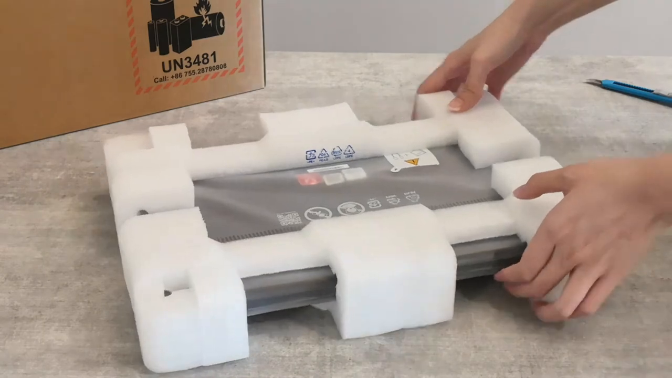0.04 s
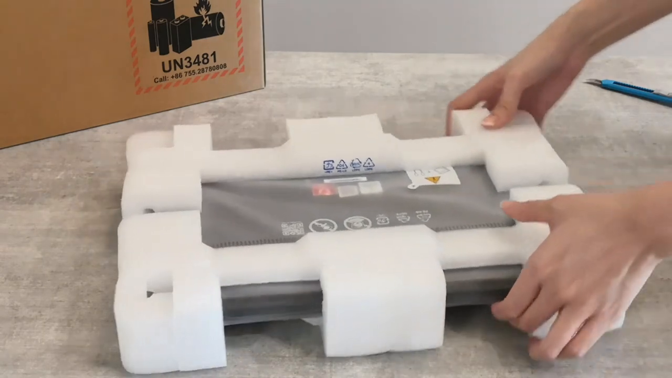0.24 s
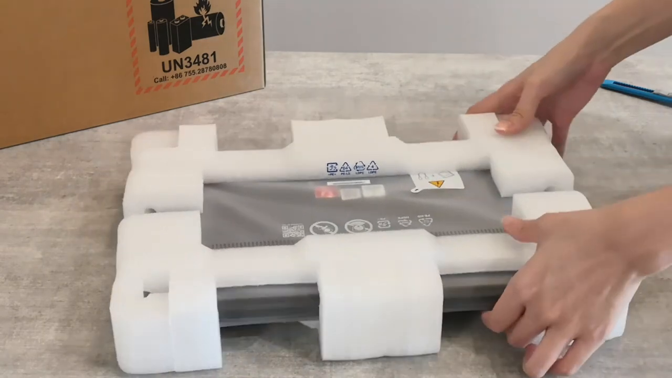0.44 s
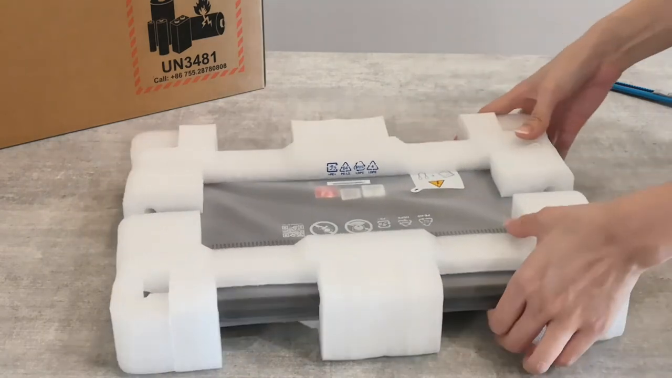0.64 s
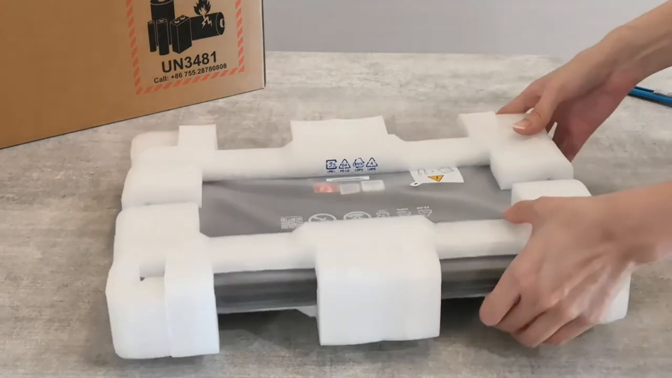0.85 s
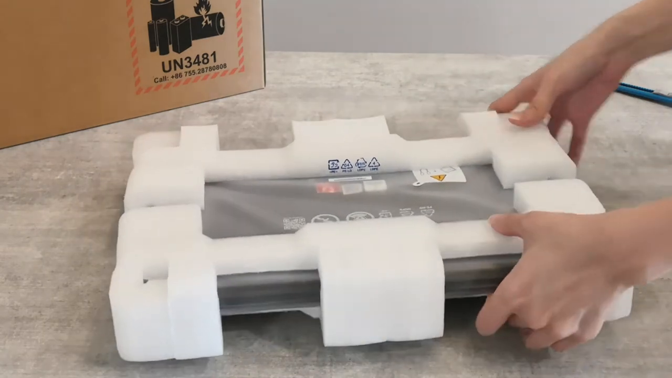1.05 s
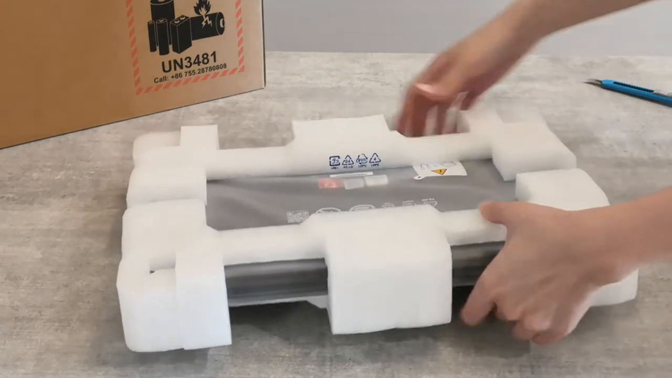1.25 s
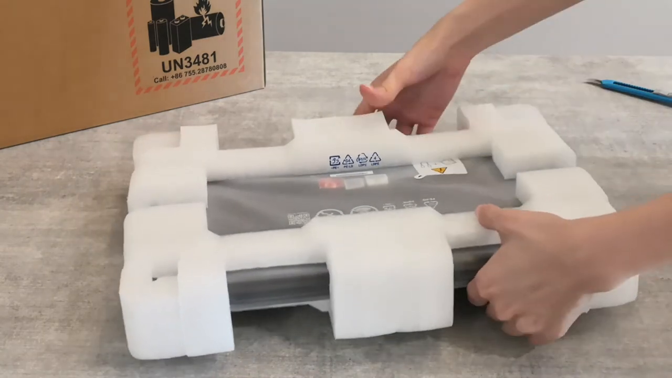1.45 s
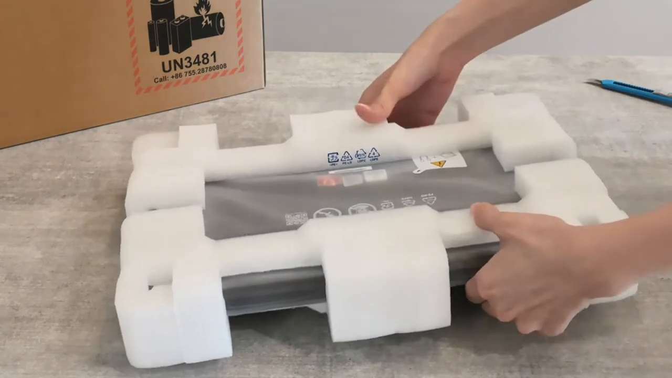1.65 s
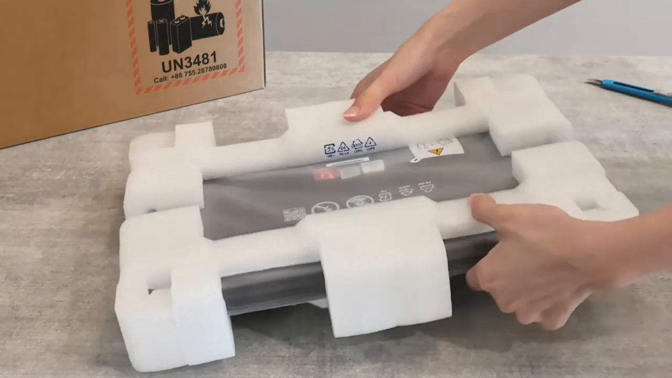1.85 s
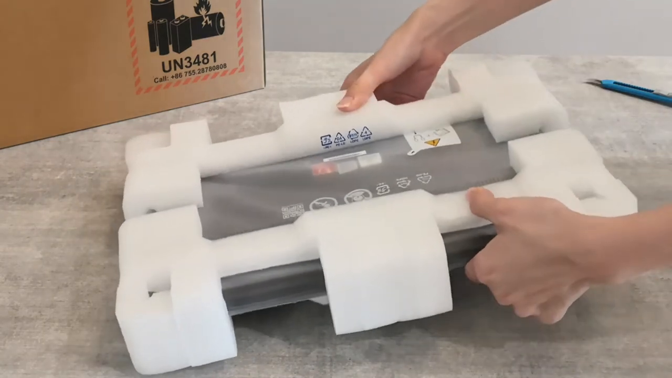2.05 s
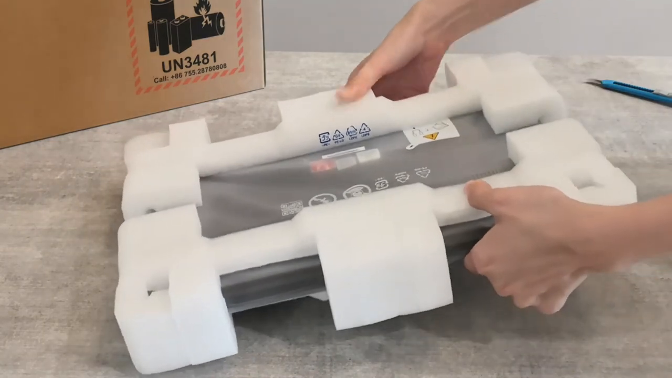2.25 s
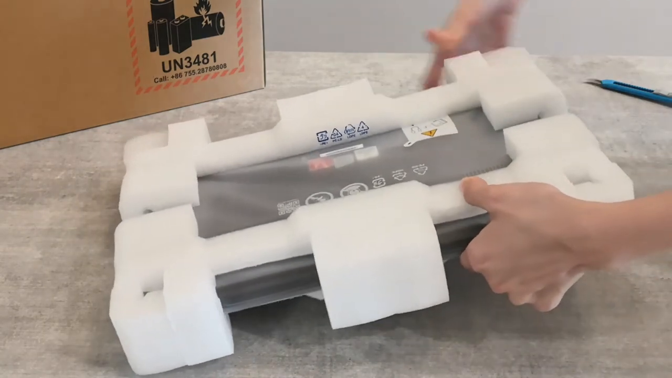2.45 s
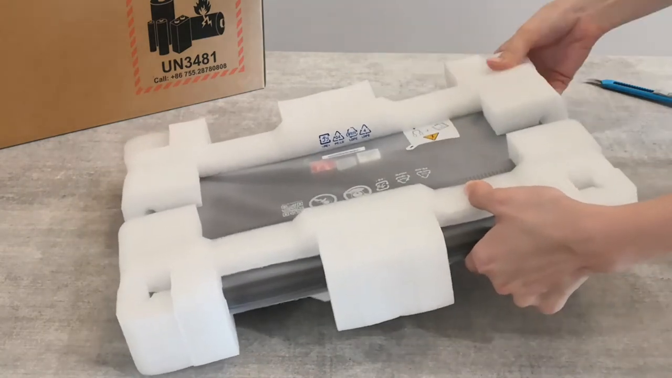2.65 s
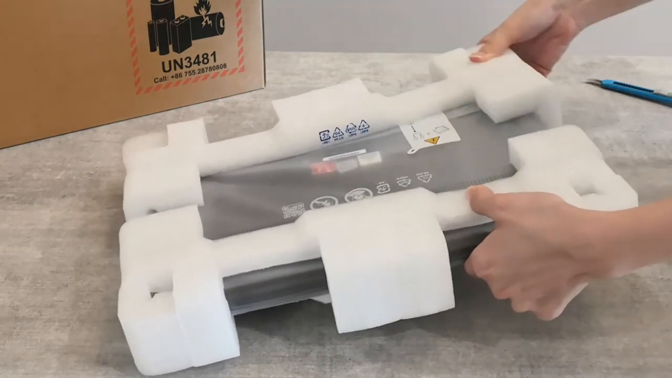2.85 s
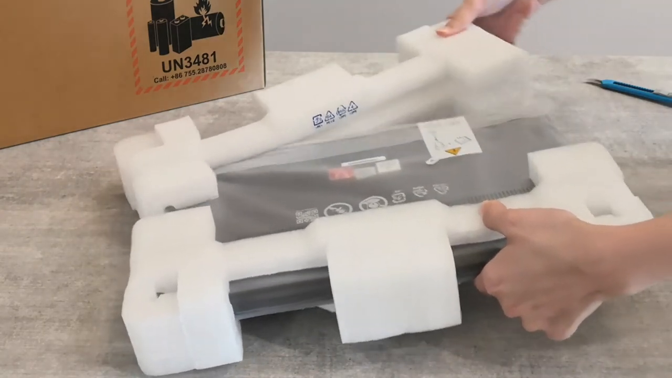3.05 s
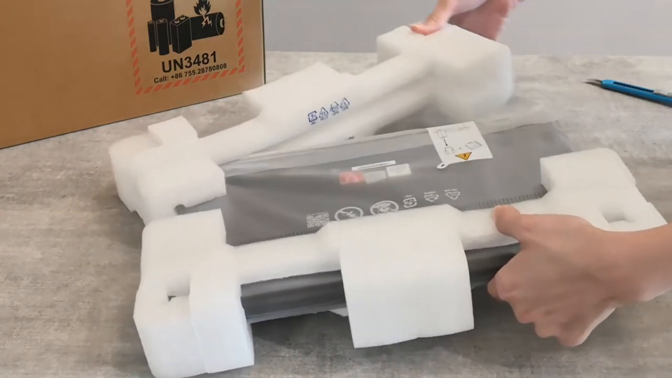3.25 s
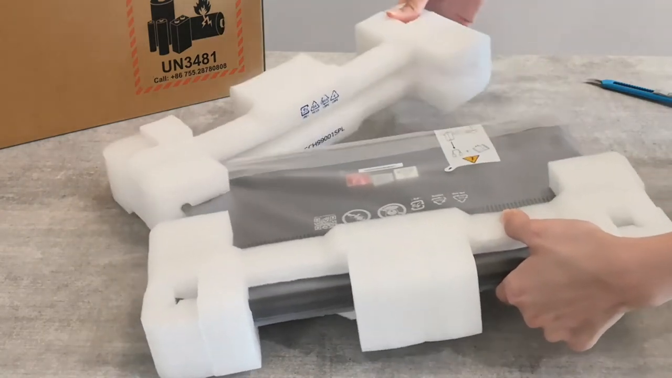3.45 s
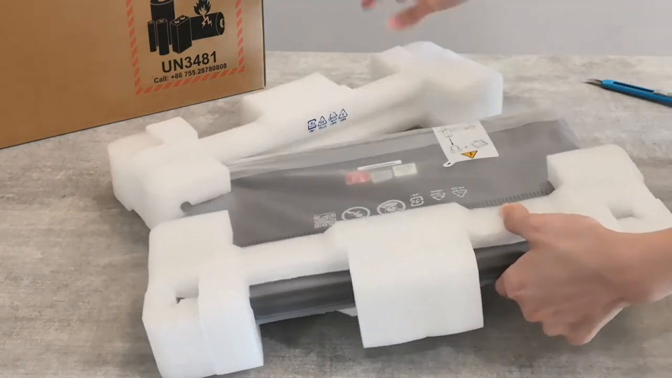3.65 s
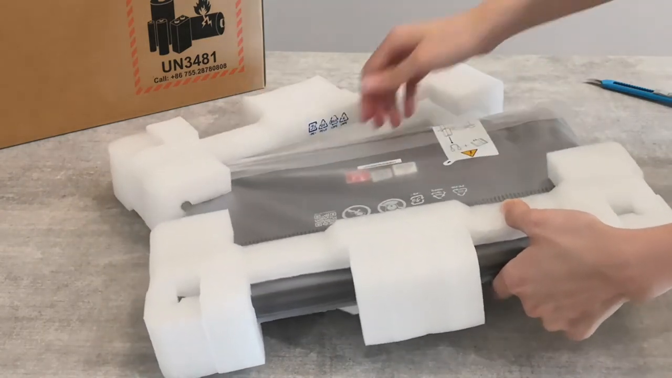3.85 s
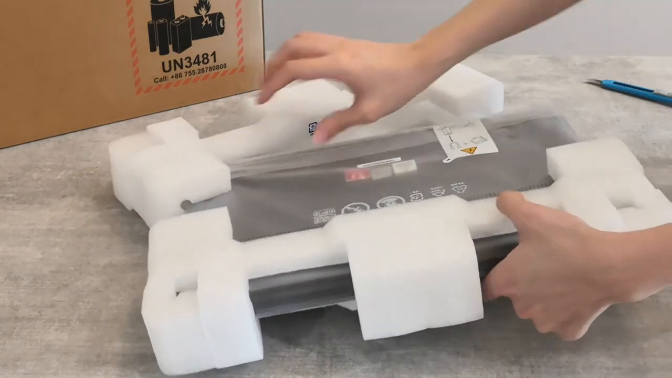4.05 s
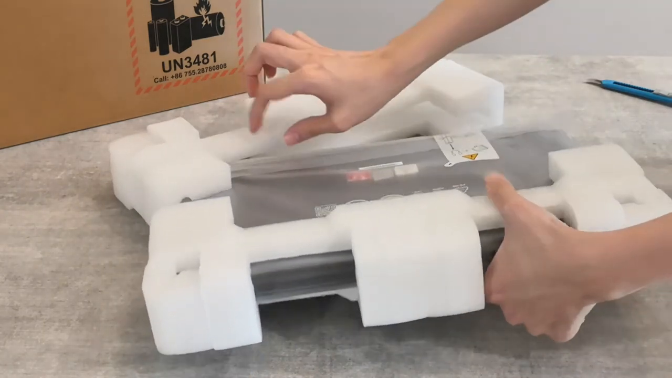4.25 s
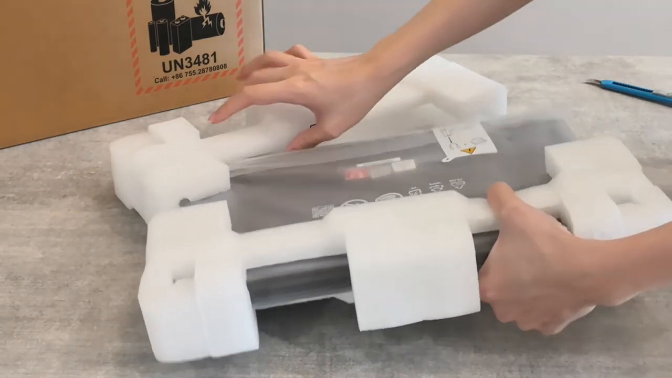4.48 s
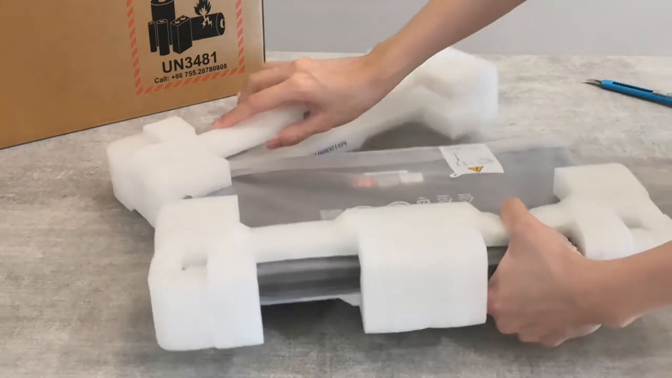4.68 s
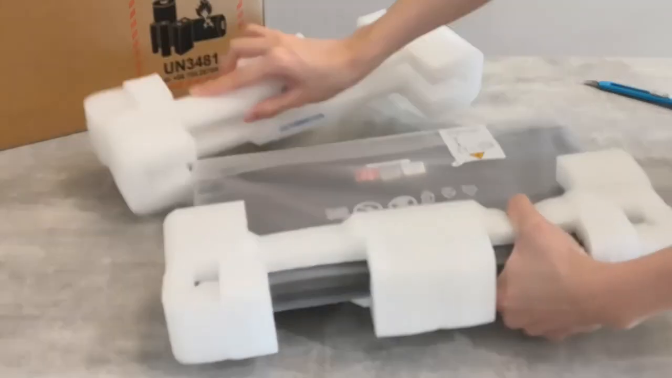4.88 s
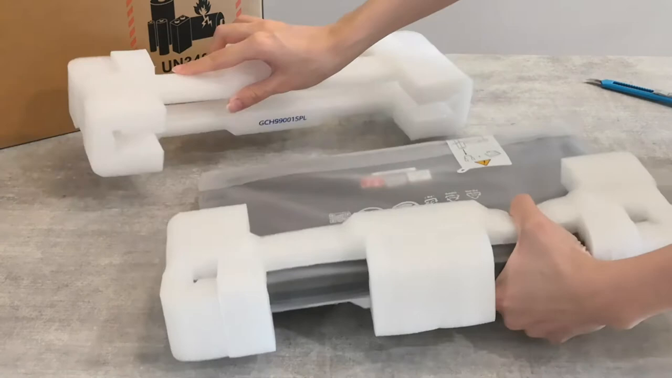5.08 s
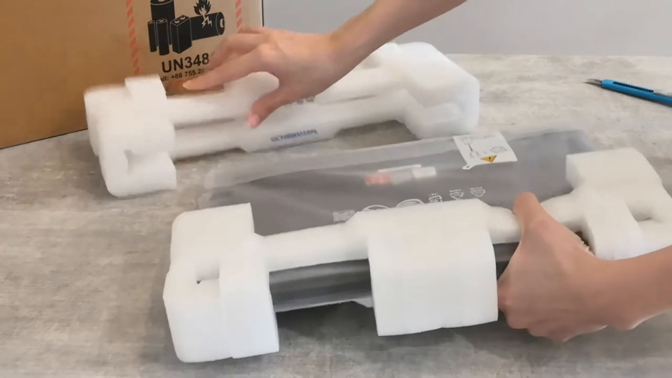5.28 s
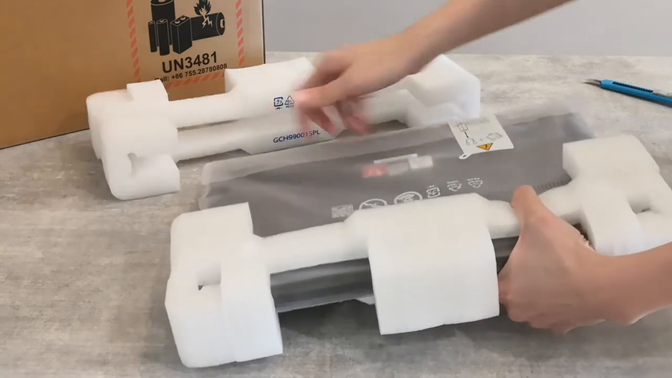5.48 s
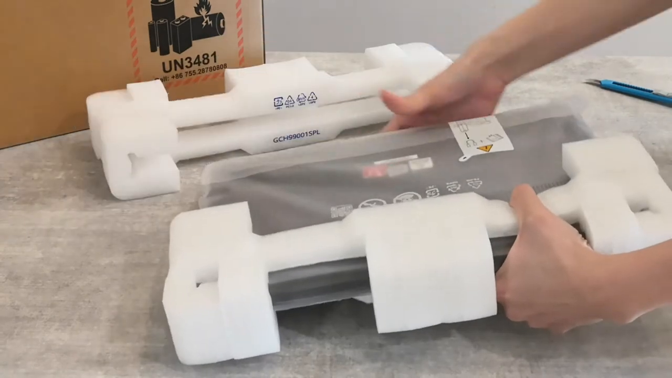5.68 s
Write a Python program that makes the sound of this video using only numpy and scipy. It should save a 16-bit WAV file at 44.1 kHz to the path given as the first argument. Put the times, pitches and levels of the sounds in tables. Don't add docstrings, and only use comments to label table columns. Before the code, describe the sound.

Foam packing scrapes briefly over a stone table, then squeaky rubbing, sharp snaps as a piece pulls free, plastic rustle and a soft thud.

```python
import sys
import numpy as np
from scipy import signal
from scipy.fft import rfft, irfft, next_fast_len
from scipy.io import wavfile
from scipy.ndimage import uniform_filter1d, map_coordinates

SR = 44100
rng = np.random.default_rng(int(sys.argv[2]) if len(sys.argv) > 2 else 0)


def transcribe(signal):
    frames = np.atleast_2d(signal).T
    limited = np.clip(frames, -1, 1)
    pcm = np.round(limited * 32767).astype(np.int16)
    wavfile.write(sys.argv[1], SR, pcm)


def attenuation_scalar(level_db):
    decades = np.asarray(level_db, float) / 20
    return 10 ** decades


N = 252252


def unit(x):
    return x / np.sqrt(np.mean(x ** 2) + 1e-20)


def along(points, hz):
    point_hz, value = np.transpose(points)
    return np.interp(np.log(hz + 1), np.log(point_hz + 1), value)


def line(rows, col):
    s, value = np.transpose(rows)[[0, col]]
    return np.interp(np.arange(N) / SR, s, value)


def wobble(rate_hz):
    knots = rng.standard_normal(int(N * rate_hz / SR) + 4)
    return map_coordinates(knots, [np.arange(N) * rate_hz / SR])


def filtered(x, response):
    size = next_fast_len(x.shape[-1] + 8192)
    spectrum = rfft(x, size) * response(np.fft.rfftfreq(size, 1 / SR))
    return irfft(spectrum, size)[..., :x.shape[-1]]


def resonance(f, hz, width_hz):
    return 1j * f * width_hz / (hz * hz - f * f + 1j * f * width_hz)


def spread(pair, spectrum, alike):
    def response(hz):
        turn = np.arccos(np.clip(along(alike, hz), -1, 1)) / 2
        return attenuation_scalar(along(spectrum, hz)) * [np.cos(turn), np.sin(turn)]
    mid, side = filtered(pair, response)
    return unit(np.array([mid + side, mid - side]))


def streaked(pair, depth_db):
    z = signal.stft(pair, nperseg=1024)[2]
    field = uniform_filter1d(rng.standard_normal(z.shape[1:]), 3, 0)
    field = uniform_filter1d(field, 7, 1)
    return signal.istft(z * attenuation_scalar(depth_db * unit(field)), nperseg=1024)[1][:, :N]


def room(x, length_s=0.55):
    # hz, t60_s
    decay = [(200, 0.23), (1000, 0.48), (3000, 0.46), (10000, 0.31)]
    hz, t, z = signal.stft(rng.standard_normal((2, int(length_s * SR))), SR, nperseg=256)
    build = 1 - np.exp(-(t / 0.0072) ** 2)
    age_s = np.maximum(0.58 * t, 1.8 * (t - 0.05))
    fall = attenuation_scalar(-60 * age_s / along(decay, hz)[:, None])
    tail = signal.istft(z * build * fall, SR, nperseg=256)[1]
    return signal.fftconvolve(x, tail / np.linalg.norm(tail[0]), axes=1)


def air():
    # hz, db_per_hz
    vent = [(12, -29), (20, -3.5), (44, -6), (153, 0.5), (523, -18.5), (940, -15.5), (1310, -18.5),
            (2110, -13.5), (2710, -14.5), (4120, -22.5), (7200, -26), (10900, -37.5), (14500, -38),
            (15700, -45)]
    # hz, likeness
    far = [(60, 0.91), (130, 1), (290, 0.64), (640, -0.32), (1410, 0.079), (3100, -0.15), (6820, -0.0095),
           (15000, 0.029)]
    level_db, drift_db = -63.5 + 2.5, 0.4 * wobble(2.5) + 0.5 * wobble(12)
    noise = streaked(rng.standard_normal((2, N)), depth_db=1.0)
    return attenuation_scalar(level_db + drift_db) * spread(noise, vent, far)


def slips(share):
    slips_per_s = 3000
    chance = rng.random((2, N))
    sizes = attenuation_scalar(np.minimum(4.0 * rng.exponential(size=N), 11)) * (chance[0] < slips_per_s / SR)
    grains = unit(sizes * np.sign(chance[1] - 0.5))
    bed = streaked(rng.standard_normal((2, N)), depth_db=2.0)
    clumps = attenuation_scalar(0.65 * wobble(100) + 0.69 * wobble(300))
    return clumps * (bed + share * np.array([grains, np.roll(grains, 37)]))


def efforts():
    # time_s, rubbing_db
    slide = [
        (0.03, -80),
        (0.048, -56.5),
        (0.12, -36.5),
        (0.22, -33),
        (0.278, -33.5),
        (0.422, -35),
        (0.476, -44.5),
        (0.522, -64.5),
        (0.62, -71),
    ]
    # time_s, rubbing_db, sleeve_hiss_db
    pull = [
        (2.86, -77.5, 8),
        (2.91, -56, 10),
        (2.952, -40.5, -2),
        (3.024, -41.5, 0.5),
        (3.122, -35, 0.5),
        (3.144, -33.5, -6),
        (3.16, -38, -3),
        (3.25, -44.5, -1),
        (3.46, -69, -8.5),
    ]
    # peak_s, peak_db, rise_s, fall_s, sleeve_hiss_db
    shifts = [(1.068, -67.5, .1, .03, 0), (1.18, -71, .08, 0.048, -4), (1.3, -72, 0.031, .05, -3),
              (1.492, -66.5, 0.07, 0.14, -20), (1.976, -68.5, 0.21, 0.11, -4.5),
              (3.5, -61.5, 0.05, 0.078, -4), (3.582, -65.5, .05, 0.041, -2), (4.3, -57.5, 0.012, 0.13, -3),
              (4.69, -62.5, 0.057, 0.25, -3), (4.85, -69, 0.099, .02, -8), (5.0, -55, 0.071, 0.02, -1),
              (5.344, -68, 0.037, 0.044, -24), (5.5, -50, 0.077, 0.12, -10.5)]
    # peak_s, peak_db, rise_s, fall_s, sleeve_hiss_db
    strokes = [(1.844, -73, 0.063, 0.056, -10), (2.16, -69, 0.098, 0.14, 5.5),
               (2.428, -59.5, 0.085, 0.073, 1.5), (2.722, -69, .04, 0.052, 2),
               (2.84, -67, 0.065, 0.079, 3.5), (3.68, -59.5, 0.052, 0.065, 0),
               (3.995, -70, 0.028, .03, 11.5), (4.035, -67.5, .02, 0.034, 5), (4.12, -70, .04, 0.086, -5),
               (4.24, -67, 0.11, 0.054, -2), (4.54, -49.5, .003, 0.084, -5),
               (4.608, -53.5, 0.03, 0.089, -6), (4.92, -55.5, 0.063, 0.28, 3),
               (5.07, -50.5, 0.012, 0.032, -5), (5.194, -63, 0.0082, 0.03, -21), (5.43, -70, 0.041, .03, 0)]
    edge_db, edge_power = 19.5, 1.21
    t = np.arange(N) / SR

    def parts(db, hiss_db, slab_db):
        return attenuation_scalar(db) * np.array([np.ones(N), attenuation_scalar(hiss_db) * np.ones(N), attenuation_scalar(slab_db) * np.ones(N)])

    def inside(rows):
        return (t > rows[0][0]) & (t < rows[-1][0])

    out = parts(-79 + 2.5 * wobble(14), -6.5, -1.5)
    out += inside(slide) * parts(line(slide, col=1), -7, -13)
    out += inside(pull) * parts(line(pull, col=1), line(pull, col=2), -14.5)
    for rows, slab_db in ((shifts, -8.5), (strokes, -18.5)):
        for s, db, rise_s, fall_s, hiss_db in rows:
            a, b = round((s - 3 * rise_s) * SR), round((s + 3 * fall_s) * SR)
            away = np.maximum((s - t[a:b]) / rise_s, (t[a:b] - s) / fall_s)
            out[:, a:b] += attenuation_scalar(db - edge_db * away ** edge_power) * attenuation_scalar([[0], [hiss_db], [slab_db]])
    return out


def rubbing():
    # hz, db_per_hz
    foam_spectrum = [(530, -64), (900, -14.5), (1690, 2), (1830, 2), (1980, 1.5), (3390, -6.5), (3800, -13),
                     (4940, -88), (8360, -120)]
    # hz, db_per_hz
    sleeve_spectrum = [(1940, -10), (3300, -4), (3690, -1.5), (4490, -4), (7420, -5), (10400, -17.5),
                       (14400, -26.5), (15400, -23), (15700, -49)]
    # hz, db_per_hz
    slab_spectrum = [(41, -42), (70, -23), (166, -1), (286, -18), (480, -2), (647, -4), (1100, 4),
                     (1430, -8), (2420, -120)]
    # hz, likeness
    near = [(60, 0.96), (130, 0.98), (290, 0.85), (640, 0.2), (1410, 0.7), (3100, 0.11), (6820, -0.19),
            (15000, -0.18)]
    # time_s, colour_hz
    colour = [(0, 1790), (1.0, 1990), (2.8, 2240), (2.95, 1910), (3.5, 1850), (3.7, 2100), (4.85, 1890),
              (5.0, 2550), (5.2, 1960)]
    foam_gain, hiss_gain, slab_gain = efforts()
    bright = np.clip((line(colour, col=1) - 1300) / 1800, 0, 1)
    body = spread(slips(share=0.53), foam_spectrum, near)
    low = unit(filtered(body, lambda hz: ((hz + 1) / 2000) ** -0.7))
    high = unit(filtered(body, lambda hz: ((hz + 1) / 2000) ** 1.2))
    foam = foam_gain * ((1 - bright) * low + bright * high)
    sleeve = hiss_gain * spread(slips(share=0.88), sleeve_spectrum, near)
    slab = slab_gain * spread(slips(share=0.19), slab_spectrum, near)
    return attenuation_scalar(1.02 * wobble(25.16)) * (foam + sleeve + slab)


def release_voice(push, ring_hz, crack_db, knock_db, ring_share):
    port_hz = 9300
    fade = attenuation_scalar(-60 * np.arange(push.shape[1]) / SR / 0.02)

    def dull(f):
        return 1 / (1 + 1.4j * f / port_hz - (f / port_hz) ** 2) ** 2

    def peak(x):
        return x / np.abs(x).max()

    ring = peak(filtered(push, lambda f: resonance(f, ring_hz, 136) * dull(f)))
    block = peak(filtered(push, lambda f: resonance(f, 1860, 850) * resonance(f, 2050, 1700) * dull(f)))
    crack = peak(filtered(push * fade, lambda f: resonance(f, 4830, 8400) ** 2 * dull(f)))
    knock = peak(filtered(push, lambda f: resonance(f, 790, 1330) ** 2))
    return ring_share * ring + 0.42 * block + attenuation_scalar(crack_db + 12) * crack + attenuation_scalar(knock_db + 9.0) * knock


def snaps():
    # start_s, peak_db, ring_hz, crack_db
    releases = [(0.0503, -36.5, 2090, -22), (0.0718, -29, 2220, -23), (1.1039, -47.5, 1900, -18),
                (1.2525, -46.5, 1970, -6.5), (1.6277, -36, 2170, -20.5), (2.9163, -40, 1860, -1),
                (2.927, -36, 2560, -1), (2.9642, -38, 2000, -6), (3.003, -40, 1800, -12),
                (3.056, -27, 3300, -7), (3.1104, -19.5, 1670, -4.5), (3.129, -23, 1680, -10),
                (3.1427, -17.5, 1570, -33), (3.477, -37.5, 1140, -6), (4.2981, -52, 2150, -8),
                (4.53, -25.5, 2660, -10), (4.5378, -34, 3140, -12), (4.9902, -32.5, 2760, -12.5)]
    # start_s, peak_db, ring_hz, crack_db
    ticks = [
        (1.6544, -46, 1830, -31.5),
        (1.8361, -39, 2550, -17.5),
        (2.1214, -44, 1900, -10),
        (3.3396, -36, 1230, -13),
        (3.6147, -51.5, 1810, -2),
        (4.552, -42, 1890, -17),
        (4.613, -33, 2610, -34),
        (4.7895, -45.5, 2760, -10),
        (5.0596, -28.5, 2640, -11.5),
    ]
    # start_s, peak_db, ring_hz, crack_db, knock_db
    bumps = [(0.6444, -44.5, 1160, -38, -9), (0.7237, -23.5, 1780, -12, -9), (0.728, -33.5, 1750, -22, -15),
             (1.6117, -49.5, 2170, -11, -6), (2.384, -50, 2070, -6, -9), (2.949, -33.5, 1670, 2, -18),
             (3.277, -30, 1140, -16, -30), (3.7363, -30.5, 2330, -13.5, -12.5),
             (3.7404, -34.5, 2270, -15.5, -7.5), (4.2305, -50.5, 2430, -2, -10),
             (5.4018, -42, 1840, -17, -19), (5.4416, -34, 2010, -32, -18), (5.445, -23.5, 1490, -25, -21),
             (5.4482, -26.5, 1490, -20, -7.5)]
    # knock_db, room_db; bumps carry their own knock
    kinds = ((releases, (-29.5, 0.41)), (ticks, (-29, -15)), (bumps, (0.29,)))
    out, t = np.zeros((2, N + SR)), np.arange(2048) / SR
    kick = np.ones((2, 1)) * (t == 0)
    events = [(*row, *kind) for rows, kind in kinds for row in rows]
    for s, db, ring_hz, crack_db, knock_db, room_db in events:
        tearing = rng.standard_normal((2, len(t))) * attenuation_scalar(-60 * t / 0.02)
        tearing[1] = 0.5 * tearing[0] + 0.97 * tearing[1]
        push = tearing + 2.9 * kick
        hit = attenuation_scalar(db - 3.0) * release_voice(push, ring_hz, crack_db, knock_db, ring_share=0.62)
        to_walls = release_voice(kick, ring_hz, crack_db, knock_db, ring_share=0.4)
        wet = attenuation_scalar(db + room_db - 2.5) * room(to_walls)
        start = round(s * SR)
        out[:, start:][:, :len(t)] += hit
        out[:, start:][:, :wet.shape[1]] += wet
    return out[:, :N]


def drops():
    # start_s, level_db
    landings = [
        (0.723, -59),
        (3.738, -54.5),
        (5.445, -34.5),
    ]
    # mode_hz, level_db, t60_s
    modes = [(124, -18, 0.99), (166, -6, 0.32), (206, -3.5, 0.31), (291, -9, 0.64), (394, 1.5, 0.096),
             (455, -15.5, 0.49)]
    out, t = np.zeros(N + SR), np.arange(SR // 2) / SR
    for s, db in landings:
        noise = rng.standard_normal(len(t))
        thump = unit(filtered(noise, lambda f: resonance(f, 278, 240) ** 2)) * attenuation_scalar(-5.5 - 60 * t / 0.33)
        for hz, level_db, t60_s in modes:
            rocking = attenuation_scalar(2.5 * wobble(45)[:len(t)])
            phase = 2 * np.pi * hz * t + 0.55 * wobble(35.3)[:len(t)]
            thump = thump + attenuation_scalar(level_db - 60 * t / t60_s) * rocking * np.sin(phase)
        onset = 1 - np.exp(-t / 0.002)
        out[round(s * SR):][:len(t)] += attenuation_scalar(db) * thump * onset
    direct = np.array([out[:N], out[:N]])
    return direct + attenuation_scalar(-8.0) * room(direct)[:, :N]


def squeaks():
    # start_s, length_s, pitch_hz, level_db
    songs = [
        (1.475, 0.055, 1170, -65),
        (1.557, 0.13, 240, -61.5),
        (3.74, 0.088, 2340, -63),
        (3.79, 0.094, 857, -70),
    ]
    t, out = np.arange(N) / SR, np.zeros(N)
    drift_s = np.cumsum(0.0131 * wobble(90)) / SR
    for s, length_s, hz, db in songs:
        turn = 2 * np.pi * hz * (t + drift_s)
        swell = np.sin(np.pi * np.clip((t - s) / length_s, 0, 1))
        out += attenuation_scalar(db) * swell * (np.sin(turn) + 0.24 * np.sin(3 * turn))
    return out


def scene():
    return air() + rubbing() + snaps() + drops() + squeaks()


def low_pass(x):
    return signal.sosfilt(signal.butter(12, 15880, fs=SR, output="sos"), x)


def record(dry):
    top_hz, busy_top_hz, busy_db = 15860, 15200, -62
    top = filtered(dry, lambda hz: hz > busy_top_hz)
    treble = filtered(dry, lambda hz: hz > 3000)[0]
    busy = uniform_filter1d(treble ** 2, 2048) > attenuation_scalar(busy_db) ** 2
    kept = dry - top * uniform_filter1d(1.0 * busy, 512)
    return low_pass(filtered(kept, lambda hz: hz < top_hz))


dry = scene()
out = record(dry)
transcribe(out)
```